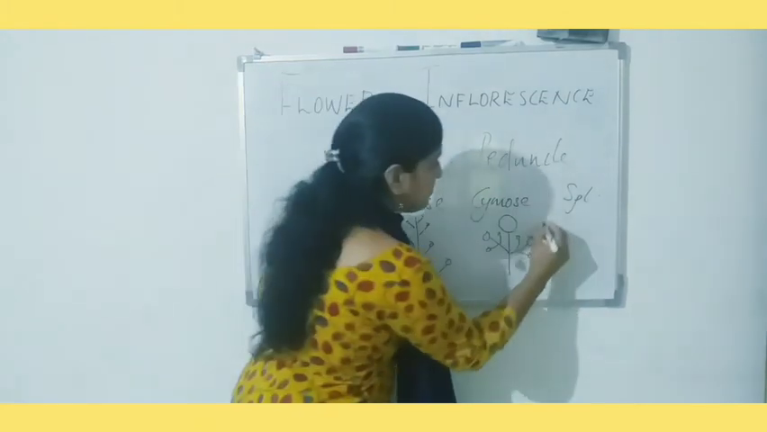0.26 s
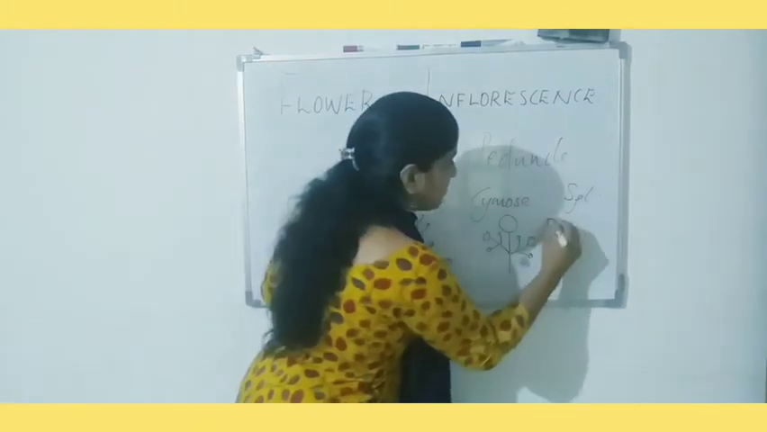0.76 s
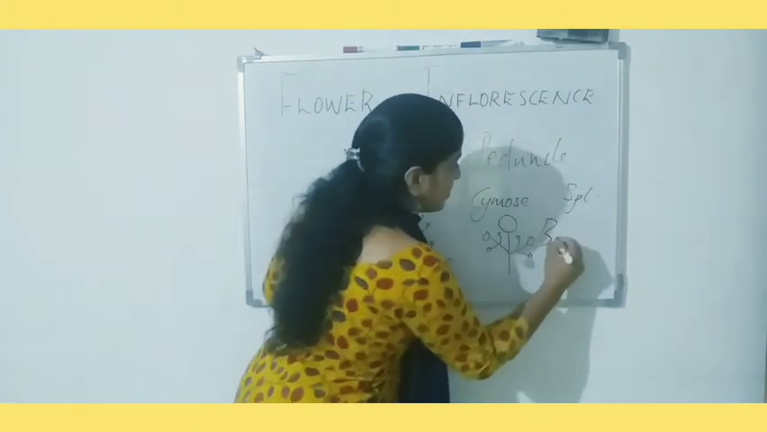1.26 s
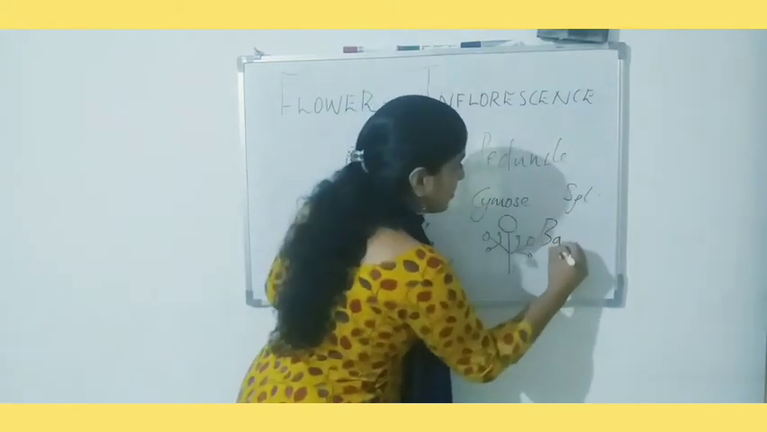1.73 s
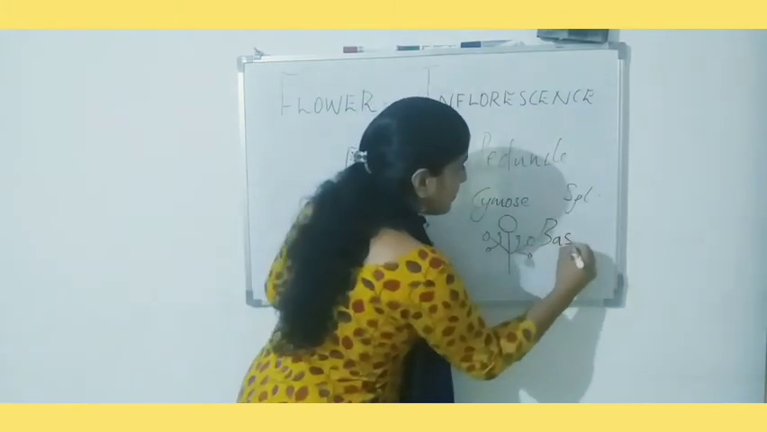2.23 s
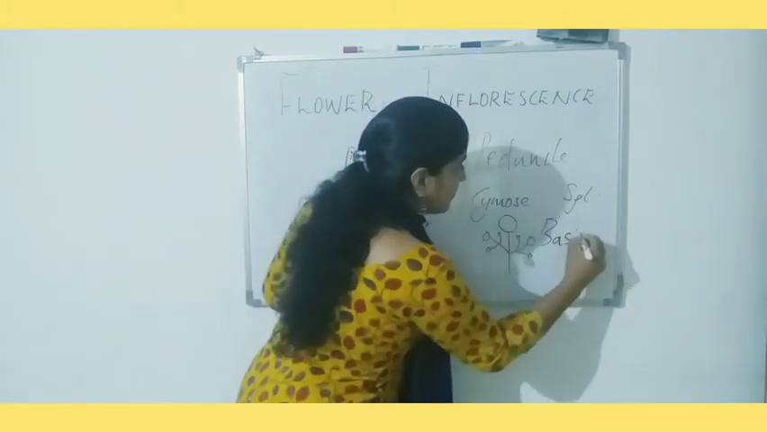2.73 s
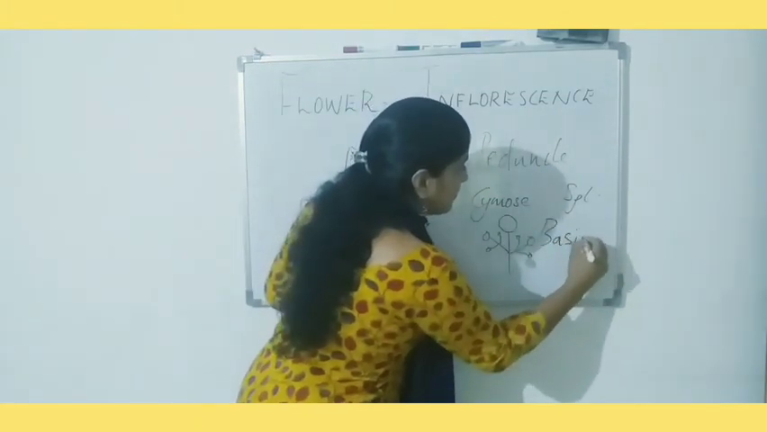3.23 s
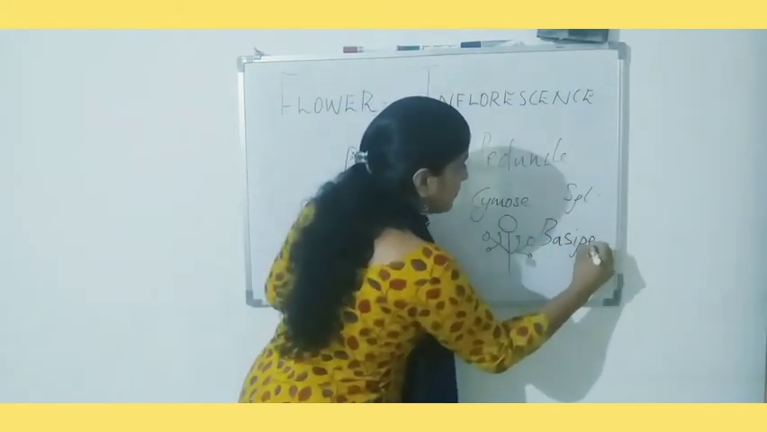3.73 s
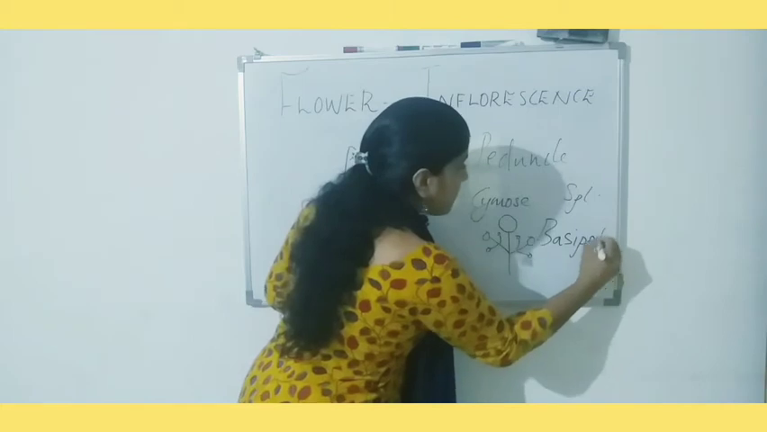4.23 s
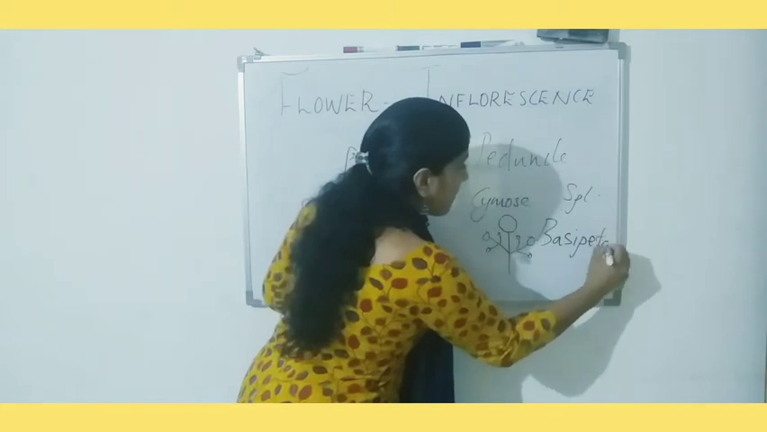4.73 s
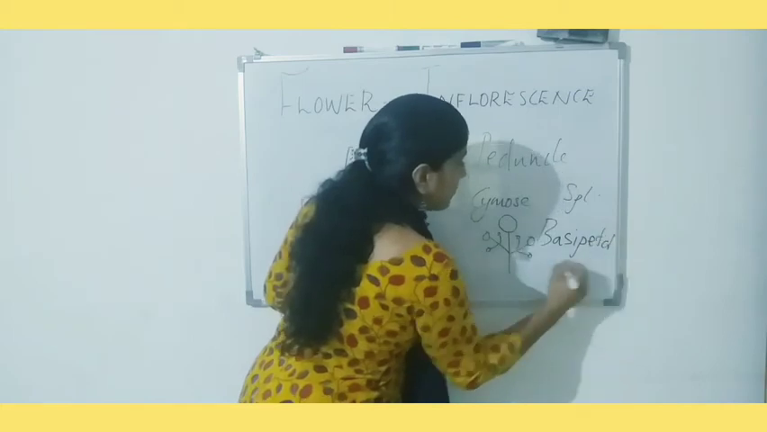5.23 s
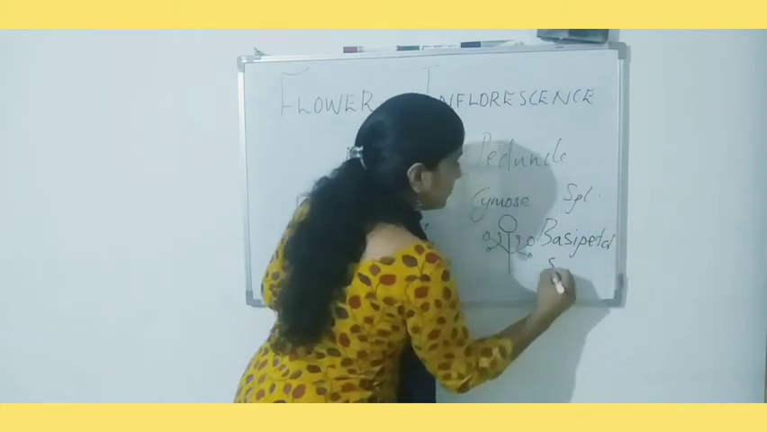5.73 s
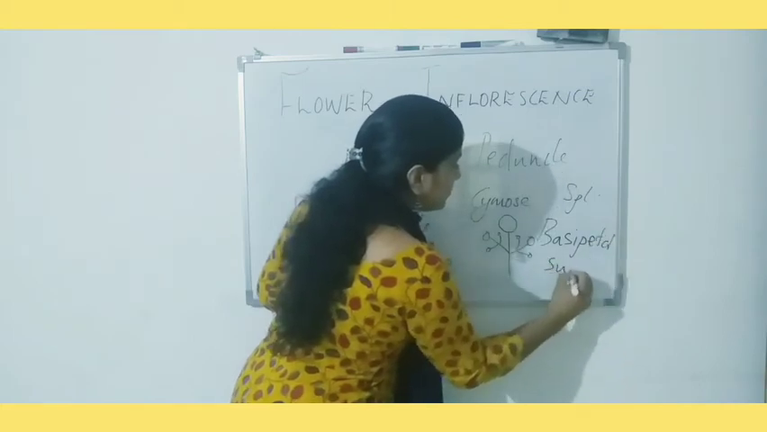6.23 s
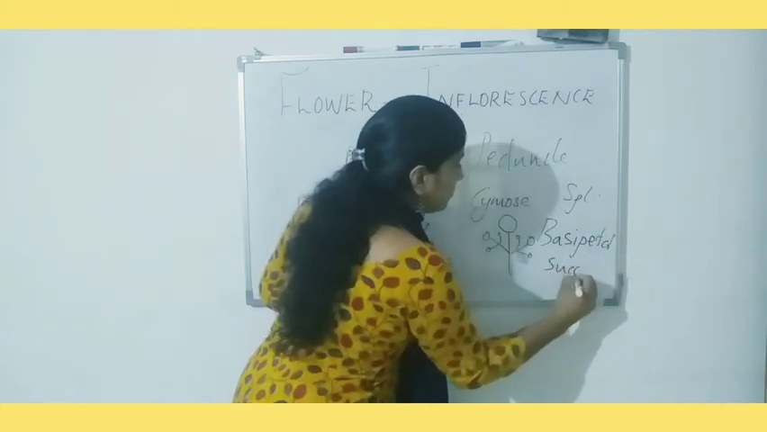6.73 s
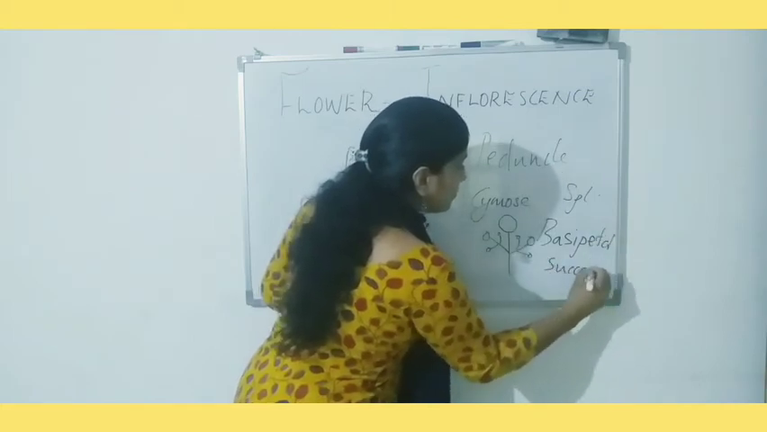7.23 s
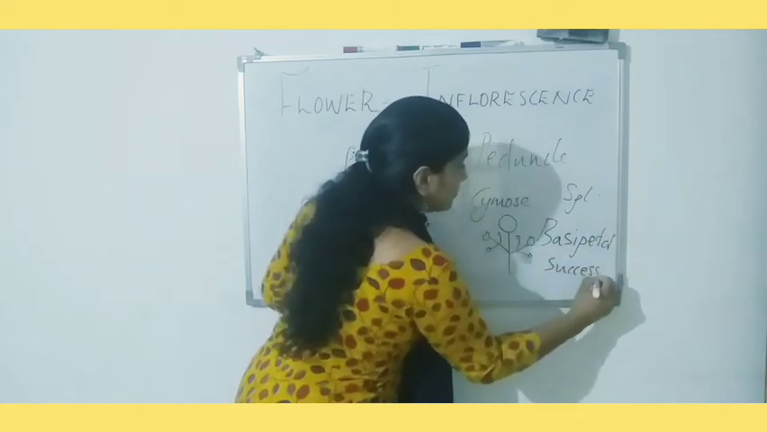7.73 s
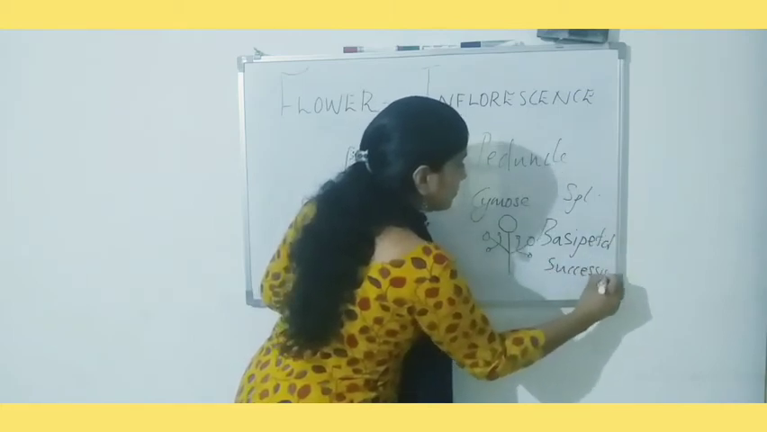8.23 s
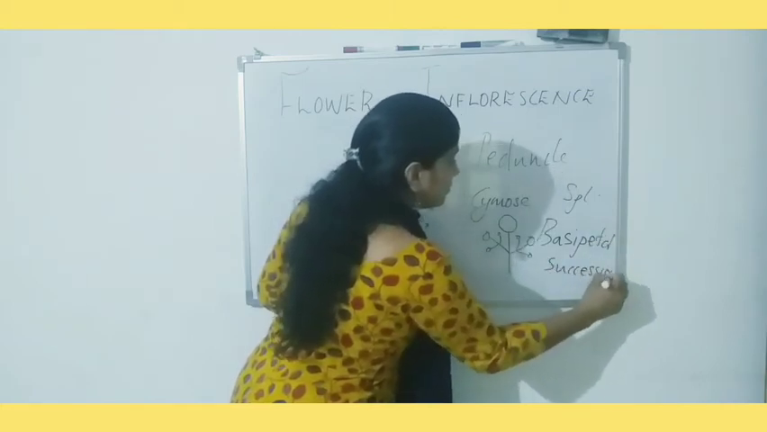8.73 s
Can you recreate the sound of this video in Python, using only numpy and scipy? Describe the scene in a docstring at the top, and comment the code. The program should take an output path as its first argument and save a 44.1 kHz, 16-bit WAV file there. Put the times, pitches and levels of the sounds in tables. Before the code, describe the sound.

A felt marker writes on a hanging whiteboard in a bare room, short soft hissing strokes mixed with dull hollow thumps and clacks.

```python
"""Thumps, clacks and felt hiss, with faint squeaks: a few words written on a wall-hung whiteboard,
heard from a few steps away in a bare classroom. Each touch rings panel modes and a noise wash, and a
delayed noise burst is the clack at the frame. Strokes are clumpy noise under arches; chafes are gliding
noise bands, squeaks gliding sines, ticks short bursts. A noise tail is the room, over steady air."""
import sys
import numpy as np
from scipy import signal
from scipy.fft import rfft, irfft, next_fast_len
from scipy.io import wavfile

SR = 44100
rng = np.random.default_rng(int(sys.argv[2]) if len(sys.argv) > 2 else 0)


def pcm_store(signal):
    """Save signal as 16-bit PCM."""
    levels = np.round(np.clip(np.atleast_2d(signal), -1, 1) * 32767)
    wavfile.write(sys.argv[1], SR, levels.astype(np.int16).T)


N = 395517
TIME_S = np.arange(N) / SR

# Background air of the room. Each row: frequency in Hz, relative density in dB.
AIR_SPECTRUM = [(15, -43), (25, -52), (80, 1.5), (119, 3.5), (234, -8), (370, -6.5), (554, -12),
                (1380, -15), (1540, -14.5), (2310, -20), (4910, -20.5), (5770, -23), (6430, -19),
                (11000, -21.5), (15600, -31)]
# Hiss that differs between the ears. Each row: frequency in Hz, relative density in dB.
SIDE_SPECTRUM = [(100, 3.5), (1500, -10), (4000, 5), (8000, 14.5), (12000, 13.5), (15500, 19)]
# Pen strokes. Each row: start in seconds, length in seconds, then felt hiss, lower scrape and panel
# rumble in dB before their trims.
STROKES = [(0.013, .15, -72, -58.5, -50.5), (0.404, 0.14, -63, -69, -64.5), (0.52, .13, -77, -71, -56.5),
           (0.741, 0.18, -62.5, -60, -55), (.92, 0.28, -64.5, -76, -65), (1.167, 0.19, -76, -70.5, -85),
           (1.44, 0.28, -67, -73.5, -69), (1.726, .13, -68, -76, -83), (1.924, 0.29, -64, -71, -68),
           (2.394, .11, -61.5, -58.5, -70), (2.642, 0.12, -69.5, -58, -54), (2.832, 0.19, -61, -59.5, -66),
           (3.215, 0.097, -59.5, -56, -56), (3.522, 0.14, -64.5, -61.5, -59),
           (3.674, 0.11, -67.5, -77, -86), (4.011, 0.11, -56, -50.5, -47.5),
           (4.231, 0.075, -61.5, -65, -76), (4.456, .15, -66, -63, -62.5), (4.624, 0.13, -65, -61.5, -82),
           (4.748, 0.073, -67.5, -67.5, -90), (4.941, .045, -56, -56.5, -63), (5.0, 0.069, -64, -63, -76),
           (5.46, 0.11, -64.5, -74, -65), (5.577, 0.12, -61, -69, -95), (5.911, 0.16, -62, -63, -54.5),
           (6.096, 0.12, -67, -65.5, -77), (6.319, 0.13, -62, -61, -59), (6.6, 0.11, -62.5, -62.5, -68),
           (6.878, .11, -64, -65, -52.5), (6.99, 0.19, -65, -72, -68), (7.234, .1, -64, -66, -71),
           (7.346, 0.098, -66.5, -81, -78), (7.6, 0.12, -59.5, -62.5, -53.5), (7.7, 0.12, -69, -67, -72),
           (7.97, .065, -56, -47.5, -44), (8.151, 0.083, -59, -56, -66), (8.24, 0.14, -65, -65.5, -76),
           (8.374, 0.039, -65, -70, -74), (8.53, .1, -64, -66, -61), (8.701, 0.057, -59, -64.5, -81),
           (8.883, 0.079, -62.5, -51.5, -42.5)]
# Felt hiss of a stroke. Each row: frequency in Hz, relative density in dB.
HISS_SPECTRUM = [(2060, -5.5), (3500, -20), (3890, -9), (5000, 2), (5740, -3.5), (6590, 0.5), (7240, -1.5),
                 (11100, 4.5), (11700, 1), (15600, -18)]
# Lower scrape of a stroke. Each row: frequency in Hz, relative density in dB.
SCRAPE_SPECTRUM = [(600, 4), (1100, 2.5), (1900, -1), (2500, -2.5), (3400, 0.5), (4500, -6.5), (6500, -14)]
# Felt chafing in a narrow band. Each row: start in seconds, length in seconds, start centre in Hz,
# end centre in Hz, nominal width in Hz, nominal level in dB.
CHAFES = [(0.01, 0.17, 1990, 1912, 2006, -60.5), (0.097, 0.32, 1803, 1583, 380, -69.5),
          (0.56, 0.248, 1477, 1317, 379, -66), (1.175, 0.47, 1520, 1360, 350, -68),
          (1.46, 0.99, 5170, 4270, 727, -84), (2.853, 0.058, 1197, 1167, 200, -53),
          (2.941, 0.13, 10400, 10800, 1520, -64.5), (4.033, 0.11, 2347, 2210, 902, -59),
          (4.486, 0.64, 3210, 3240, 354, -78), (5.02, 0.063, 10900, 11450, 1420, -64),
          (6.108, 0.18, 2520, 2890, 1370, -73.5), (6.6, 0.51, 1600, 1520, 240, -77.5),
          (6.893, 0.044, 2310, 2170, 1940, -72), (7.038, 0.058, 10950, 11000, 980, -64),
          (8.123, 0.023, 3180, 3460, 1090, -59.5), (8.158, 0.093, 1827, 1835, 300, -57.5),
          (8.159, 0.094, 3470, 3820, 1100, -65), (8.398, 0.031, 3240, 2880, 1240, -64.5)]
# Skids of the tip. Each row: start in seconds, length in seconds, start pitch in Hz, end pitch in Hz,
# peak in dB before the room.
SQUEAKS = [(1.685, 0.0058, 860, 910, -53), (6.108, 0.0013, 577, 1900, -42),
           (6.1275, 0.0025, 2300, 3070, -52.5), (6.8827, 0.0041, 1460, 3550, -44)]
# Crisp landings of the tip. Each row: start in seconds, peak in dB before trim and room.
TICKS = [(0.025, -37), (1.036, -50), (4.016, -34), (4.948, -43), (4.962, -47), (6.326, -36.5), (6.600, -47),
         (7.250, -40), (7.968, -30), (7.971, -28.5), (8.000, -28)]
# Tick colour. Each row: frequency in Hz, relative density in dB.
TICK_SPECTRUM = [(1500, 2.5), (4000, -1.5), (8000, 2), (11000, 8.5), (13000, -15), (16000, -1)]
# Clack of panel on frame. Each row: frequency in Hz, relative density in dB.
CLACK_SPECTRUM = [(400, -16), (900, 17.5), (1500, 9), (2200, 0), (3500, -25), (6000, -13.5), (15000, -65)]
# Marker touches. Each row: start in seconds, then thump of the low modes, ring of the middle modes and
# knock of the high modes in dB before the trims.
TOUCHES = [(0.089, -77, -55.5, -66), (0.381, -52.5, -54.5, -72), (0.428, -52.5, -58.5, -66),
           (0.545, -54.5, -60.5, -71), (0.749, -42, -38.5, -52.5), (0.862, -49.5, -54.5, -67),
           (1.064, -59, -61.5, -87), (1.183, -56, -70, -71), (1.403, -54.5, -58, -79),
           (1.848, -62, -53.5, -59), (1.95, -46.5, -45, -56), (2.382, -40, -33, -57),
           (2.536, -57, -53.5, -57), (2.641, -41, -35, -61), (2.684, -49, -46, -57), (2.839, -41, -33, -49),
           (3.067, -60, -49, -54.5), (3.215, -41, -34, -53), (3.527, -42, -40, -56),
           (4.013, -39.5, -36, -48), (4.034, -42.5, -43.5, -71), (4.241, -53.5, -55.5, -63),
           (4.466, -42, -39.5, -55), (4.95, -49, -58, -68), (5.32, -62, -77, -82), (5.387, -59, -55, -67),
           (5.44, -57, -54.5, -67), (5.863, -44.5, -49, -69), (5.944, -43.5, -49, -60.5),
           (5.994, -50.5, -52, -67), (6.321, -43, -38, -49), (6.592, -43.5, -42, -61),
           (6.858, -43, -41, -60), (7.135, -63.5, -64, -74), (7.244, -48, -46, -66),
           (7.475, -59.5, -64, -76), (7.604, -42.5, -38, -51.5), (7.967, -41.5, -36.5, -43.5),
           (8.124, -64, -60, -63), (8.189, -47, -40.5, -55), (8.523, -46, -51, -82), (8.552, -59, -51, -63),
           (8.722, -47.5, -63.5, -86), (8.88, -41, -34.5, -46.5)]
# Panel modes and the room modes they wake. Each row: frequency in Hz, relative level in dB,
# T60 in seconds before hand damping.
BOARD_MODES = [(82.2, -30, 0.42), (107.7, -20.5, 0.22), (125, -1, 0.12), (197.6, -11.5, 0.37),
               (206, -2.5, 0.13), (244.5, -13, 0.21), (335, -23, 0.61), (352.2, 5, 0.075), (350, -9, 0.56),
               (370.4, -9, 0.58), (402, -9, 0.5), (458.5, -12, 0.49), (466.8, -2.5, 0.17),
               (488.5, -8.5, 0.34), (546, -18, 0.27), (586.4, -5.5, 0.14), (681, -11.5, 0.43),
               (747.5, -2, 0.13), (897, -10.5, 0.2), (973, -7, 0.17), (1112, -15.5, 0.29),
               (1184, -23, 0.12), (1212, -21, 0.089), (1700, -50, 0.14), (2010, -41, 0.081)]
# Dense weaker modes between them. Each row: frequency in Hz, relative density in dB.
BOARD_WASH_SPECTRUM = [(25, -49), (45, -30), (75, -1), (120, -4.5), (260, 1), (420, -1.5), (600, -5),
                       (1000, -11.5), (1500, -19.5), (2300, -24.5), (4000, -45)]

# Ring level of a firm touch; the laws below count dB from here.
FIRM_RING_DB = -35
# Arches of a stroke: share of its length at the peak, steepness. The tip bears down hardest early.
HISS_ARCH = (0.48, 0.22)
PRESSURE_ARCH = (0.18, 0.34)


def from_db(db):
    """Decibels to gain."""
    return 10 ** (np.asarray(db) / 20)


def rms_one(x):
    """Scale to rms 1."""
    return x / np.sqrt(np.mean(x ** 2) + 1e-20)


def at_hz(points, hz):
    """Read a spectrum on a log-frequency axis."""
    point_hz, value = np.transpose(points)
    return np.interp(np.log(np.maximum(hz, 1)), np.log(point_hz), value)


def coloured(x, spectrum):
    """Shape a noise by a spectrum; rms 1."""
    size = next_fast_len(len(x))
    hz = np.arange(size // 2 + 1) * SR / size
    shaped = rfft(x, size) * from_db(at_hz(spectrum, hz))
    return rms_one(irfft(shaped, size)[:len(x)])


def drift(rate_hz, size):
    """Random points at rate_hz joined by lines; spread near 1."""
    steps = np.arange(size) * rate_hz / SR
    count = int(steps[-1]) + 2
    return np.interp(steps, np.arange(count), rng.standard_normal(count))


def fade(t_s, t60_s):
    """Exponential decay, 60 dB in t60_s."""
    return np.exp(-np.log(1000) * t_s / t60_s)


def rise(t_s, time_constant_s):
    """Exponential approach to 1."""
    return 1 - np.exp(-t_s / time_constant_s)


def glide(start_hz, end_hz, size):
    """Complex tone sliding geometrically in pitch."""
    return np.exp(2j * np.pi * np.cumsum(np.geomspace(start_hz, end_hz, size)) / SR)


def add(track, start_s, sound):
    """Mix a sound in at start_s."""
    start = int(np.clip(start_s * SR, 0, N - 1))
    track[start:start + len(sound)] += sound[:N - start]


def room_air(level_db=-65.5):
    """Steady coloured noise, the same in both ears."""
    return from_db(level_db) * coloured(rng.standard_normal(N), AIR_SPECTRUM)


def side_hiss(level_db=-79.0):
    """Faint steady noise, opposite in sign at the two ears."""
    hiss = from_db(level_db) * coloured(rng.standard_normal(N), SIDE_SPECTRUM)
    return hiss * np.array([[1], [-1]])


def classroom(x, wet_db=-2.5, first_echo_s=0.0049, t60_s=0.32):
    """Bare walls answer with a dense, decaying noise tail."""
    t_s = TIME_S[:SR * 3 // 4]
    tail = rng.standard_normal(len(t_s)) * fade(t_s, t60_s) * (t_s > first_echo_s)
    tail /= np.sqrt(np.sum(tail ** 2))
    return x + from_db(wet_db) * signal.fftconvolve(x, tail)[:N]


def radiated(x):
    """A small panel radiates little deep bass: steep high-pass at 60 Hz."""
    return signal.sosfilt(signal.butter(6, 60, "high", fs=SR, output="sos"), x)


def friction(spectrum, grain_db, grain_rate_hz):
    """Felt fibres catch and let go in clumps: noise with a drifting level; rms 1."""
    grains = from_db(grain_db * drift(grain_rate_hz, N))
    return coloured(rng.standard_normal(N) * grains, spectrum)


def shifting(x, patchy_db=4.0, turn_rate_hz=22, count=14):
    """As the tip turns, each treble band swells and sinks on its own; rms 1."""
    hz, t_s, bands = signal.stft(x, SR, nperseg=256)
    frames = np.minimum((t_s * SR).astype(int), N - 1)
    turns = np.array([drift(turn_rate_hz, N)[frames] for _ in range(count)])
    # everything below 2 kHz follows the lowest band
    centres_hz = np.linspace(2000, 15000, count)
    shares = np.array([np.interp(hz, centres_hz, row) for row in np.eye(count)])
    gain = from_db(patchy_db * shares.T @ turns)
    return rms_one(signal.istft(bands * gain, SR)[1][:N])


def stroke_gain(column, arch, tail_t60_s=0.54, tail_share=0.44):
    """Each stroke swells and eases off in an arch; part of its power lingers in the room."""
    peak, steepness = arch
    power = np.zeros(N)
    for start_s, length_s, *level_db in STROKES:
        along = np.linspace(0, 1, max(int(length_s * SR), 10))
        phase = np.interp(along, [0, peak, 1], [0, .5, 1])
        swell = np.abs(np.sin(np.pi * phase)) ** steepness
        add(power, start_s, (from_db(level_db[column]) * swell) ** 2)
    keep = fade(1 / SR, tail_t60_s) ** 2
    lingering = signal.lfilter([1 - keep], [1, -keep], power)
    return np.sqrt((1 - tail_share) * power + tail_share * lingering)


def strokes(hiss_db=-1.5, scrape_db=-0.5, rumble_db=2.5):
    """The sliding tip hisses, scrapes and makes the panel rumble."""
    hiss = shifting(friction(HISS_SPECTRUM, grain_db=1.7, grain_rate_hz=400))
    scrape = shifting(friction(SCRAPE_SPECTRUM, grain_db=2.5, grain_rate_hz=300))
    rumble = friction(BOARD_WASH_SPECTRUM, grain_db=2.5, grain_rate_hz=90)
    return (from_db(hiss_db) * stroke_gain(0, HISS_ARCH) * hiss
            + from_db(scrape_db) * stroke_gain(1, PRESSURE_ARCH) * scrape
            + from_db(rumble_db) * radiated(stroke_gain(2, PRESSURE_ARCH) * rumble))


def chafes():
    """Irregular slipping smears a tone into a husky band that starts briskly and eases off."""
    out = np.zeros(N)
    for start_s, length_s, start_hz, end_hz, width_hz, db in CHAFES:
        size = max(int(length_s * SR), 10)
        along = np.linspace(0, 1, size)
        pressure = np.minimum(along / 0.04, 1) * np.cos(along * np.pi / 2)
        slips = drift(width_hz, size) + 1j * drift(width_hz, size)
        band = (slips * glide(start_hz, end_hz, size)).real
        add(out, start_s, from_db(db) * pressure * band)
    return out


def squeaks():
    """Brief, clean stick-slip tones: gliding sines."""
    out = np.zeros(N)
    for start_s, length_s, start_hz, end_hz, db in SQUEAKS:
        size = max(int(length_s * SR), 10)
        tone = signal.windows.tukey(size, .7) * glide(start_hz, end_hz, size).imag
        add(out, start_s, from_db(db) * tone)
    return out


def snaps(events, spectrum, t60_s, trim_db):
    """Hard contacts: noise bursts that die within milliseconds."""
    out, t_s = np.zeros(N), TIME_S[:SR // 10]
    for start_s, db in events:
        burst = coloured(rng.standard_normal(len(t_s)), spectrum) * fade(t_s, t60_s) * rise(t_s, .0004)
        add(out, start_s, from_db(db + trim_db) * burst / np.abs(burst).max())
    return out


def ticks():
    """The tip lands with a crisp tick."""
    return snaps(TICKS, TICK_SPECTRUM, t60_s=0.0048, trim_db=-8.0)


def clacks(firm_peak_db=-35.5, firm_delay_s=.009, level_law=0.99, delay_law=.5):
    """The driven panel meets its frame after each touch; a lighter touch clacks sooner and softer."""
    events = []
    for start_s, _, ring_db, _ in TOUCHES:
        firmness_db = ring_db - FIRM_RING_DB
        delay_s = firm_delay_s * from_db(delay_law * firmness_db)
        events.append((start_s + delay_s, firm_peak_db + level_law * firmness_db))
    return radiated(snaps(events, CLACK_SPECTRUM, t60_s=0.015, trim_db=0))


def mode_rings(t_s, travel_at_350_hz_s=0.001):
    """Decaying sines; bending waves are slower at low pitch, so bass arrives last and swells longer."""
    hz, mode_db, t60_s = np.transpose(BOARD_MODES)[:, :, None]
    age_s = np.maximum(t_s - travel_at_350_hz_s * np.sqrt(350 / hz), 0)
    swell = 1 - np.exp(-2 * age_s * hz)
    rings = from_db(mode_db) * np.sin(2 * np.pi * hz * age_s) * fade(age_s, t60_s) * swell
    return hz[:, 0], rings


def touches(modes_db=-1.7, wash_db=(-11.0, -14.0, -9.0), scatter_db=1.5):
    """Each touch rings three panel registers, each as strongly as where and how the tip lands sets."""
    firm_t60_s, damping_law = 3, 0.69
    out, t_s = np.zeros(N), TIME_S[:SR * 3 // 4]
    hz, rings = mode_rings(t_s)
    # the diffuse wash builds up as the room fills; the first push of the tip is a short, dry burst
    dying = fade(t_s, .42) * rise(t_s, .021)
    push = fade(t_s, .02) * rise(t_s, .0006)
    push_db = (-8, 2, 13)  # per register, over the wash
    edges_hz, attack = (35, 275, 600, 4000), SR // 20
    for k, (low_hz, high_hz) in enumerate(zip(edges_hz, edges_hz[1:])):
        register = rings[(hz >= low_hz) & (hz < high_hz)]
        band = signal.butter(2, [low_hz, high_hz], "band", fs=SR, output="sos")
        shape = dying + from_db(push_db[k]) * push
        for start_s, *level_db in TOUCHES:
            # the lighter the touch, the sooner the resting hand damps the panel
            held_t60_s = firm_t60_s * from_db(damping_law * (level_db[1] - FIRM_RING_DB))
            held = fade(t_s, held_t60_s)
            mode_gains = from_db(scatter_db * rng.standard_normal(len(register)))
            modes = mode_gains @ register * held
            noise = coloured(rng.standard_normal(len(t_s)), BOARD_WASH_SPECTRUM)
            wash = signal.sosfilt(band, noise * shape * held)
            # both are levelled over the first 50 ms
            blow = from_db(modes_db) * modes / np.std(modes[:attack])
            blow += from_db(wash_db[k]) * wash / np.std(wash[:attack])
            add(out, start_s, from_db(level_db[k]) * blow)
    return radiated(out)


def scene():
    """The writing sits in the centre; only a faint hiss differs between the ears."""
    in_room = classroom(chafes() + squeaks() + ticks() + clacks())
    return room_air() + side_hiss() + strokes() + in_room + touches()


def record(dry):
    """The top is cut steeply at 15.6 kHz."""
    return signal.sosfilt(signal.ellip(12, .1, 80, 15600, fs=SR, output="sos"), dry)


dry = scene()
out = record(dry)
pcm_store(out)
```